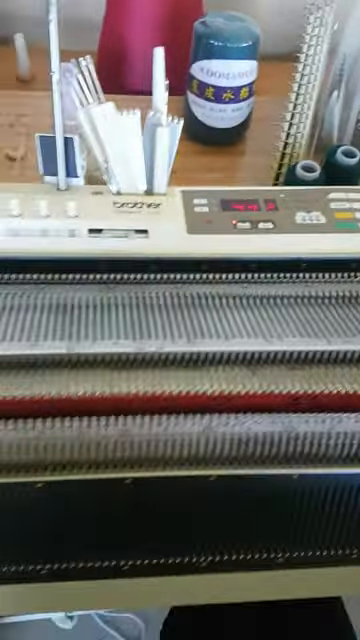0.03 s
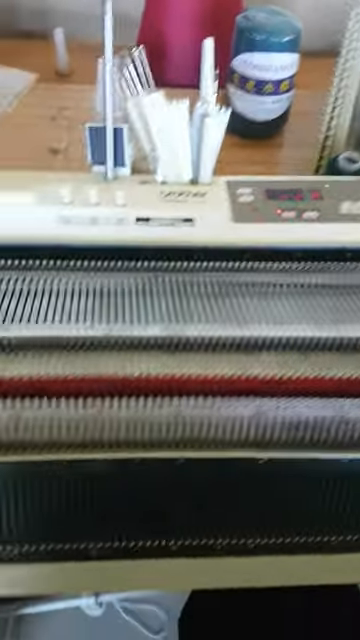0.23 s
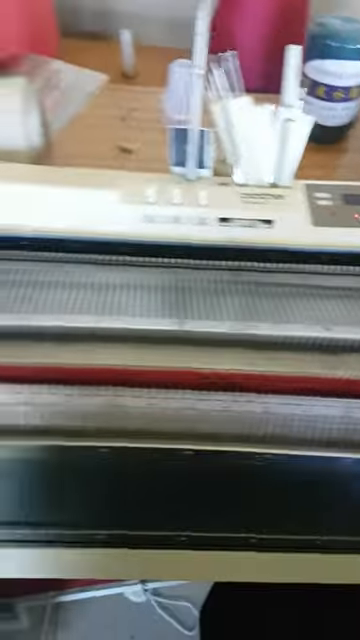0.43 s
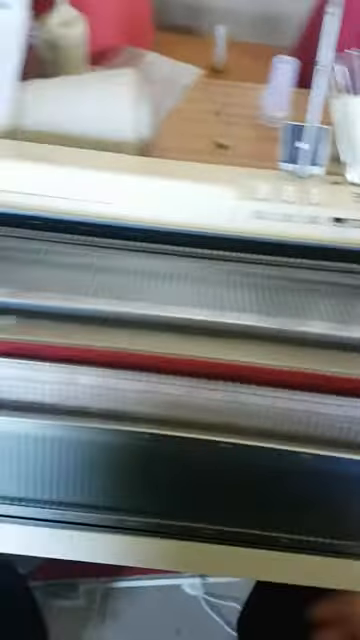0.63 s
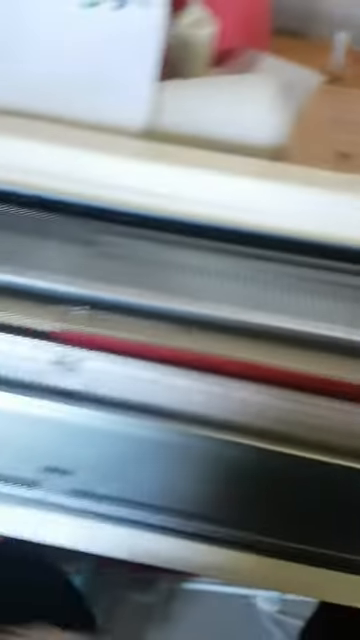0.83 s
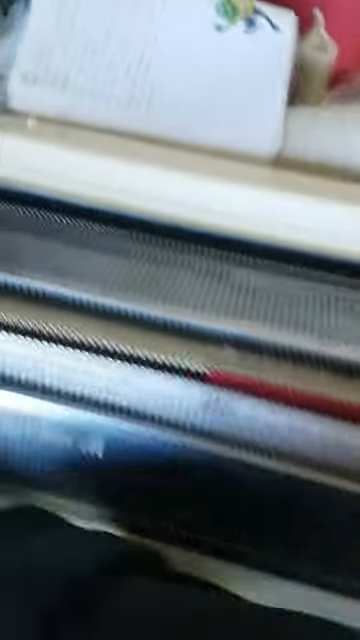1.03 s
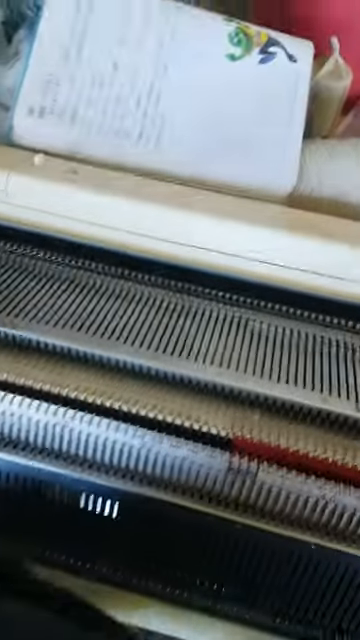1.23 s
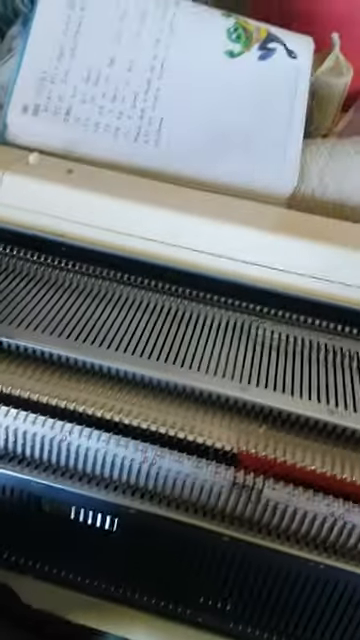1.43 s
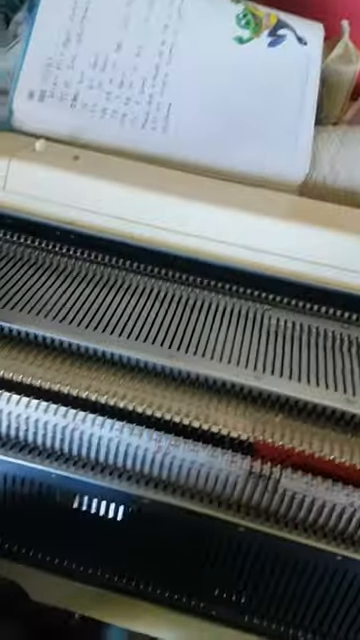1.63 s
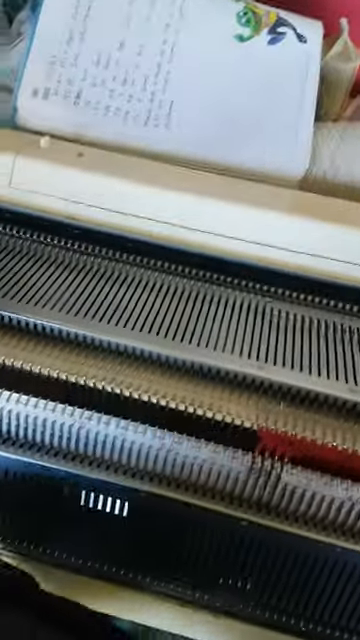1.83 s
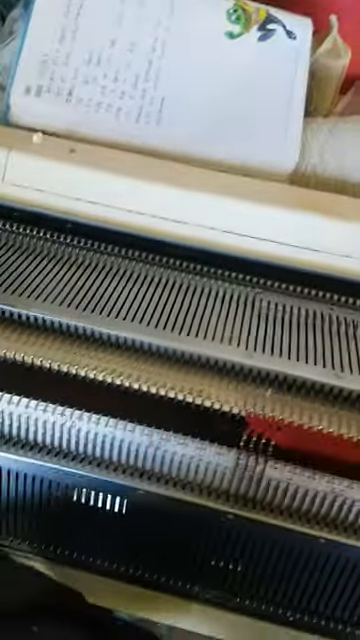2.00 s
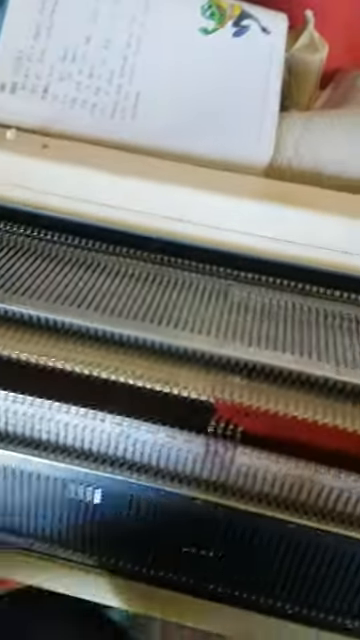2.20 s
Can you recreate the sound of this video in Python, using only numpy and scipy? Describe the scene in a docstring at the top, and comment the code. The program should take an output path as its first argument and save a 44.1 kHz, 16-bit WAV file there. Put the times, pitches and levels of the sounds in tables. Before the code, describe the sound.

A knitting machine's metal bed clicks loose and drops with a rattling clunk after soft taps.

```python
"""A few soft, dull handling taps, then sharp clicks and a ringing steel clunk in a small room:
the needle bed of a knitting machine is lowered. Its catches snap, the bed drops and bounces on its
stops, the blows set its modes ringing and loose needles chatter in their slots. Each contact is a
sharp wavefront, a burst of dense ringing and the room's answer. Underneath lie a quiet room rumble,
a faint rustle of handling and a thin high whine."""
import sys
import numpy as np
from scipy import signal
from scipy.fft import rfft, irfft, next_fast_len
from scipy.io import wavfile

SR = 44100
rng = np.random.default_rng(int(sys.argv[2]) if len(sys.argv) > 2 else 0)


def dump(signal):
    """Clip the signal to [-1, 1] and save it as 16-bit WAV at the path in sys.argv[1]."""
    limited = np.clip(np.atleast_2d(signal).T, -1, 1)
    pcm = np.round(limited * 32767).astype(np.int16)
    wavfile.write(sys.argv[1], SR, pcm)


N = 99665

# clunks on the stops: t/s, bass/dB, middle/dB, treble/dB, top/dB
BED_CLUNKS = [(1.8583, 18, 11.5, 9.5, 5), (1.870, 17.5, 6.5, 8, -6), (1.8928, 10.5, 12, 6, 2),
              (1.9284, 14, 22.5, 24.5, 19), (1.9317, 23, 21.5, 8, 5), (1.9424, 23.5, 18.5, 17.5, 9),
              (1.954, 17, 18, 10.5, 4), (1.965, 9.5, 8, 15.5, 12), (1.9809, 10.5, 18.5, 16, 16.5),
              (1.997, 7, 13.5, 13, 9), (2.014, 14, 1.5, 13, 11)]
# tail of a clunk: f/Hz, t60/s
CLUNK_TAIL = [(150, 0.12), (500, 0.083), (1600, 0.051), (4000, 0.07), (11000, 0.048)]
# ring of the bed: f/Hz, level/dB, t60/s
BED_MODES = [(140.5, 0, 1), (269.4, -1.5, 0.26), (304.6, -10, 0.15), (392, -1.5, 0.19), (465.3, -1.5, 0.29),
             (503, -5, 0.16), (609, 2, 0.29), (749, -10, 0.38), (922, -3.5, 0.22), (980, -3.5, 0.3),
             (1061, -7.5, 0.27), (1474, 5.5, 0.075), (1593, -5, 0.2), (2830, -7.5, 0.14)]
# the two landings: t/s
THUD_TIMES = [1.9305, 1.9415]
# thud of the frame: f/Hz, level/dB, t60/s
FRAME_MODES = [(86, -13, 0.034), (141, -15.5, 0.099), (266, -12.5, 0.049)]
BED_ATTACK_S = 0.0084

def bed(ring_db=-54):
    """The bed lands with a deep double thud and bounces on its stops; heavier blows ring it louder."""
    out = np.zeros((2, N))
    for start, *tone_db in BED_CLUNKS:
        add(out, start, contact(steel(tone_db), CLUNK_TAIL, room_db=-1, snap=0.2))
        add(out, start, amp(ring_db + tone_db[0]) * ring(BED_MODES, BED_ATTACK_S, spread_db=2))
    for start in THUD_TIMES:
        add(out, start, ring(FRAME_MODES, attack_s=0.002, spread_db=3))
    return out


# colour of steel on steel: f/Hz, level/dB
STEEL_EQ = [(25, -30), (66, -5.5), (140, 9), (220, 1), (400, 2.5), (530, -1), (950, -2), (1450, -9),
            (2100, -6.5), (2750, -13), (3100, -21), (3700, -17.5), (4300, -22.5), (5200, -25),
            (6500, -32.5), (8400, -40), (11500, -27.5), (15500, -33.5)]
# bass, middle, treble and top of a hit: f/Hz
TONE_BANDS = [250, 1300, 4000, 12000]

def steel(tone_db):
    """The EQ curve of a steel hit, tilted by where and how hard it lands."""
    tilt = list(zip(TONE_BANDS, tone_db))
    return lambda hz: along(STEEL_EQ, hz) + along(tilt, hz)


# clicks: t/s, bass/dB, middle/dB, treble/dB, top/dB, ping/dB, lever/dB, body/Hz, tick/Hz, bed ring/dB
CATCH_CLICKS = [(1.559, -1, 10, 12, 15, -12, -24, 1540, 10060, -45.5),
                (1.6949, 9, 11.5, 7, 10.5, -17, -17.5, 3750, 11700, -47.5),
                (2.0652, 5, 4, 6, 7.5, -30.5, -41, 4170, 12600, -46),
                (2.095, 2, -1.5, -8, -12, -56, -50, 3900, 11500, -60),
                (2.1171, 1.5, 1.5, 5, 3.5, -32, -41, 4300, 12800, -57)]
# tail of a click: f/Hz, t60/s
CLICK_TAIL = [(150, 0.32), (500, 0.18), (1600, 0.053), (4000, .028), (11000, 0.016)]
# ping of the catch: f/Hz, level/dB, t60/s
CATCH_MODES = [(912, -18.5, 0.05), (1000, -28, 0.26), (1445, -11, 0.021), (1626, 0, 0.0089),
               (1834, -8, 0.019), (2076, -6.5, 0.017)]
# clack of its lever: f/Hz, level/dB, t60/s
LEVER_MODES = [(338, 0, 0.013), (429, -8, 0.067), (817, -18, 0.079), (1402, -8, 0.017), (2720, -8, 0.0085),
               (3590, -8.5, 0.013), (4000, -14, 0.015)]

def catches(body_db=6, body_octaves=0.7, tick_db=7, tick_width_hz=720):
    """A hollow snap with a high tick: the catch pings, its lever clacks and the bed rings faintly."""
    out = np.zeros((2, N))
    for start, *tone_db, ping_db, lever_db, body_hz, tick_hz, bed_db in CATCH_CLICKS:
        body = lambda hz: body_db * np.exp(-(np.log2((hz + 1) / body_hz) / body_octaves) ** 2)
        tick = lambda hz: tick_db * np.exp(-((hz - tick_hz) / tick_width_hz) ** 2)
        colour = lambda hz: steel(tone_db)(hz) + body(hz) + tick(hz)
        add(out, start, contact(colour, CLICK_TAIL, room_db=-1, snap=0.19))
        for modes, db in (CATCH_MODES, ping_db), (LEVER_MODES, lever_db):
            add(out, start, amp(db) * ring(modes, attack_s=0.00078, spread_db=1.5))
        add(out, start, amp(bed_db) * ring(BED_MODES, BED_ATTACK_S, spread_db=2))
    return out


# shakes of the bed: t/s, hold/s, level/dB
SHAKES = [(1.871, 0.077, -16.5), (1.943, 0.048, -4.5)]
# colour of the chatter: f/Hz, level/dB
NEEDLE_EQ = [(80, 3), (300, 13), (1000, -1.5), (2500, -6), (5000, -12), (6800, -20), (8500, -36),
             (11500, -24.5), (14200, -15.5), (16000, -55)]

def needles(ticks_per_s=480, scatter_db=3, tick_t60=0.014, shake_t60=0.2):
    """Loose needles chatter in their slots at uneven gaps while the bed shakes."""
    t = np.arange(N) / SR
    shake = sum(amp(db - 60 * np.maximum(t - start - hold, 0) / shake_t60) * (t > start)
                for start, hold, db in SHAKES)
    when = ((np.arange(N) + rng.random(N)) * SR / ticks_per_s).astype(int)
    strength = amp(scatter_db * rng.standard_normal(N))
    ticks = shake * np.bincount(when[when < N], strength[when < N], N)
    energy_kept = np.exp(-2 * np.log(1000) / (tick_t60 * SR))  # per sample
    envelope = np.sqrt(signal.lfilter([1 - energy_kept], [1, -energy_kept], ticks ** 2))
    chatter = envelope * irfft(noise_spectra(DIRECT_IMAGE, N), N)
    return filtered(chatter, lambda hz: amp(along(NEEDLE_EQ, hz)))


# knocks on the casing, mostly handling, one a thump after the first click: t/s, knock/dB, cutoff/Hz, t60/s,
# bright edge/dB, ring/dB, ring/Hz, ring t60/s
CASING_KNOCKS = [(0.027, 5, 413, 0.29, -42, -46, 155.5, 0.18),
                 (.125, -8.5, 930, 0.14, -23, -56, 200, 0.055),
                 (0.2257, 3.5, 1140, 0.14, -22.5, -37.5, 603, 0.061),
                 (.367, -8, 756, 0.024, -28, -66, 200, .05),
                 (0.384, -9.5, 1550, 0.14, -14, -54, 200, 0.056),
                 (.678, 7, 690, 0.04, -34, -32.5, 853, 0.042),
                 (0.714, -12.5, 1000, 0.048, -4.5, -44, 237, 0.2),
                 (1.074, -32, 500, .05, -28, -43, 88, 0.28), (1.148, -18, 500, 0.044, -6, -36, 73.6, 0.066),
                 (1.286, -2.5, 790, 0.014, -39, -27.5, 232, 0.038),
                 (1.567, 9, 490, 0.0086, -35, -27.5, 148, 0.066),
                 (1.69, 5.5, 1100, 0.064, -18, -29.5, 170, 0.31),
                 (2.139, -3.5, 640, 0.055, -21, -24, 235, 0.026)]
# colour of a knock on the casing: f/Hz, level/dB
CASING_EQ = [(40, -25.5), (140, 3), (240, -0.5), (350, -1.5), (520, -8), (610, 0.5), (720, -6), (880, -1.5),
             (1200, -7.5), (1800, -2), (5000, -4)]

def taps():
    """Knocks on the casing: a dull bump with a faint bright edge and one short ring. Most come from handling;
    one is a thump just after the first click."""
    out = np.zeros((2, N))
    for start, db, cutoff_hz, t60, bright_db, ring_db, ring_hz, ring_t60 in CASING_KNOCKS:
        dull = lambda hz: 1 / np.sqrt(1 + (hz / cutoff_hz) ** 8)
        bright = lambda hz: amp(bright_db + along(NEEDLE_EQ, hz))
        colour = lambda hz: db + along(CASING_EQ, hz) + 20 * np.log10(dull(hz) + bright(hz))
        add(out, start, contact(colour, [(1000, t60)], room_db=-5.5, snap=0.17))
        add(out, start, ring([(ring_hz, ring_db, ring_t60)], attack_s=0.00079, spread_db=1.5))
    return out


# stereo image of the direct sound: f/Hz, left-right correlation
DIRECT_IMAGE = [(180, 0.98), (400, 0.99), (700, 0.81), (1200, 0.27), (2000, 0.25), (4500, 0.5),
                (12000, 0.26)]
# stereo image of the reverb: f/Hz, left-right correlation
REVERB_IMAGE = [(110, 0.82), (200, 0.86), (350, 0.73), (600, 0.43), (1000, -0.63), (2000, -0.1),
                (12000, -0.09)]
# reverb tail: f/Hz, t60/s
REVERB_TAIL = [(100, 0.8), (400, 0.42), (1500, 0.27), (5000, 0.24), (12000, 0.2)]
# reverb colour: f/Hz, level/dB
REVERB_EQ = [(100, -19), (400, -3.5), (1500, -1.5), (4500, -3), (12000, -11.5)]

def contact(colour, decay, room_db, snap, build_s=0.0035):
    """One hit: a wavefront (snap = its share of the direct energy), dense ringing and room reverb."""
    reverb = burst(REVERB_TAIL, REVERB_IMAGE, size=24000)
    t = np.arange(reverb.shape[1]) / SR
    sound = filtered(reverb, lambda hz: amp(room_db + along(REVERB_EQ, hz)))
    sound *= 1 - np.exp(-(t / build_s) ** 2)  # reflections build up
    add(sound, 0, np.sqrt(1 - snap) * burst(decay, DIRECT_IMAGE))
    sound[:, 0] += np.sqrt(snap)
    return coloured(sound, colour)


def burst(decay, image, size=8192):
    """Dense ringing of flat spectrum and energy 1 a side; each band dies at its own speed."""
    edges = np.r_[0, np.geomspace(180, SR / 2, num=12)]
    hz, t = np.fft.rfftfreq(size, 1 / SR), np.arange(size) / SR
    bands = (hz >= edges[:-1, None]) & (hz < edges[1:, None])
    t60 = along(decay, (edges[:-1] + edges[1:]) / 2)
    noise = irfft(noise_spectra(image, size) * bands[:, None])
    tails = noise * amp(-60 * t / t60[:, None, None])
    gain = np.sqrt(2 * bands.mean(1) / np.sum(tails ** 2, axis=(1, 2)))
    return np.tensordot(gain, tails, 1)


def ring(modes, attack_s, spread_db):
    """Struck modes die away, their balance a little different at every blow."""
    t = np.arange(SR * 3 // 4) / SR
    hz, db, t60 = np.transpose(modes)[:, :, None]
    level = amp(db + spread_db * rng.standard_normal(db.shape))
    partials = level * np.sin(2 * np.pi * hz * t) * amp(-60 * t / t60)
    return partials.sum(0) * (1 - np.exp(-t / attack_s))


# fader moves of the handling noise: t/s, rumble/dB, rustle/dB
HANDLING_FADERS = [(0, 4, -4), (0.198, -1.5, -8), (.35, -4.5, -19), (.56, -1, -10.5), (.7, 2.5, -0.5),
                   (.85, 0, -13), (1.08, 1, 0), (1.25, -4, -8), (1.45, -2.5, -11.5), (1.8, 4, 3)]
# colour of the room tone: f/Hz, level/dB
AIR_EQ = [(20, -9), (50, -5), (95, -2), (170, -5), (260, -9.5), (400, -13.5), (550, -23), (900, -21.5),
          (1250, -28), (1750, -22), (2500, -30.5), (3600, -37.5), (4400, -33.5), (6200, -45.5),
          (8800, -50.5), (12000, -43), (15500, -40), (16200, -52)]
# its balance: f/Hz, left minus right/dB
AIR_PAN = [(100, -0.5), (250, -2), (500, -5.5), (1100, -10), (1500, 0), (1950, 7.5), (2700, -0.5),
           (3300, 6.5), (4000, 4), (6000, 1.5)]
# its stereo image: f/Hz, left-right correlation
AIR_IMAGE = [(100, 0.95), (250, 0.95), (400, 0.84), (900, 0), (2000, 0), (5000, 0), (12000, 0)]
# colour of the rustle: f/Hz, level/dB
RUSTLE_EQ = [(100, -3), (400, 3.5), (900, 7), (1600, -1), (3000, -7), (4800, -10), (7500, -26),
             (12000, -39)]
# balance of the machine and its rustle: f/Hz, left minus right/dB
MACHINE_PAN = [(60, 0), (125, -1), (200, -1.8), (380, -4.5), (700, -2.5), (1290, -1), (2380, 0), (3200, -3),
               (4400, -11), (6000, -9), (8120, 0), (15000, -3)]
SIDES = np.array([[0.5], [-0.5]])  # splits a difference between left and right

def room_tone(air_db=-50, rustle_db=-61, rumble_hz=312):
    """Steady hiss over a slowly swelling rumble, with a faint rustle of handling."""
    times, *faders = np.transpose(HANDLING_FADERS)
    swell, rub = [amp(np.interp(np.arange(N) / SR, times, db)) for db in faders]
    air = stereo_noise(AIR_EQ, AIR_PAN, AIR_IMAGE)
    rumble = filtered(air, lambda hz: np.exp(-(hz / rumble_hz) ** 2))
    hiss = air - rumble
    rustle = stereo_noise(RUSTLE_EQ, MACHINE_PAN, DIRECT_IMAGE)
    return amp(air_db) * (hiss + swell * rumble) + amp(rustle_db) * rub * rustle


# balance of the whine: gain, left then right
WHINE_PAN = [
    [1],
    [0.075],
]

def whine(pitch_hz=14275, depth_hz=45, jitter_hz=120, level_db=-77.5):
    """A thin high whine on the left, steady in level and slightly unsteady in pitch."""
    jitter = unit(filtered(rng.standard_normal(N), lambda hz: np.exp(-(hz / jitter_hz) ** 2)))
    phase = 2 * np.pi * np.cumsum(pitch_hz + depth_hz * jitter) / SR
    return amp(level_db) * unit(np.sin(phase)) * WHINE_PAN


def stereo_noise(eq, pan, image):
    """Steady noise of RMS 1 with the given colour, balance and width."""
    white = irfft(noise_spectra(image, N), N)
    return unit(filtered(white, lambda hz: amp(along(eq, hz) + SIDES * along(pan, hz))))


def noise_spectra(image, size):
    """Spectra of left and right white noise, correlated as the image says."""
    mid, side = rfft(rng.standard_normal((2, size)))
    angle = np.arccos(along(image, np.fft.rfftfreq(size, 1 / SR))) / 2
    return np.cos(angle) * mid + 2 * SIDES * np.sin(angle) * side


def coloured(x, level_db, size=32768):
    """A short sound through a minimum-phase EQ, so nothing rings ahead of the hit."""
    gain = np.maximum(amp(level_db(np.fft.rfftfreq(size, 1 / SR))), 1e-6)
    cepstrum = irfft(np.log(gain))
    cepstrum[1:size // 2] *= 2
    cepstrum[size // 2 + 1:] = 0
    return irfft(rfft(x, size) * np.exp(rfft(cepstrum)), size)[..., :x.shape[-1]]


def filtered(x, response):
    """A sound through a frequency response."""
    n = x.shape[-1]
    size = next_fast_len(n + 4096, True)
    return irfft(rfft(x, size) * response(np.fft.rfftfreq(size, 1 / SR)), size)[..., :n]


def along(points, hz):
    """Read a curve of (f/Hz, value) points on a log frequency axis."""
    freqs, values = np.transpose(points)
    return np.interp(np.log(hz + 1), np.log(freqs + 1), values)


def add(track, start_s, sound):
    """Mix a sound in at its start time."""
    part = track[:, round(start_s * SR):][:, :sound.shape[-1]]
    part += sound[..., :part.shape[1]]


def amp(db):
    """Decibels to gain."""
    return 10 ** (np.asarray(db) / 20)


def unit(x):
    """Scale to RMS 1."""
    return x / np.sqrt(np.mean(x ** 2) + 1e-20)


def scene(radiate_hz=59.4, left_lag_s=0.00005):
    """The machine sits a little to the right and is too small to radiate deep bass."""
    low_cut = signal.butter(3, radiate_hz, "high", fs=SR, output="sos")
    machine = signal.sosfilt(low_cut, catches() + bed() + needles())
    pan = lambda hz: amp(SIDES * along(MACHINE_PAN, hz))
    lag = lambda hz: np.exp(-2j * np.pi * hz * SIDES * left_lag_s)
    return filtered(taps() + machine, lambda hz: pan(hz) * lag(hz)) + room_tone() + whine()


def record(dry, low_cut_hz=27, top_hz=16000):
    """The microphone sheds the deepest bass and keeps nothing above its band limit."""
    return filtered(dry, lambda hz: 1j * hz / (1j * hz + low_cut_hz) * (hz < top_hz))


dry = scene()
out = record(dry)
dump(out)
```